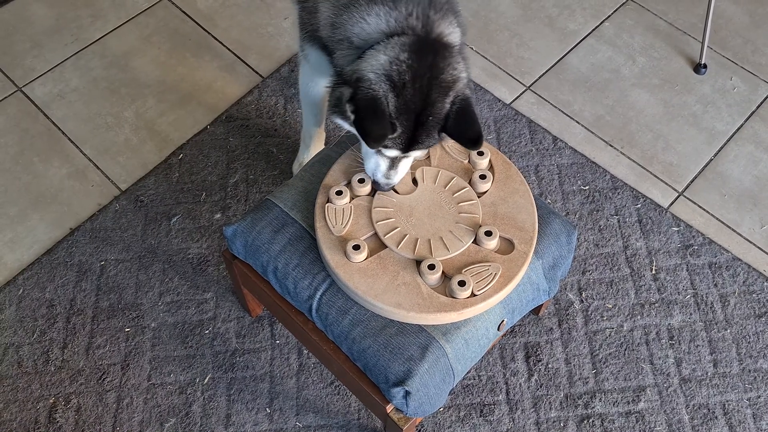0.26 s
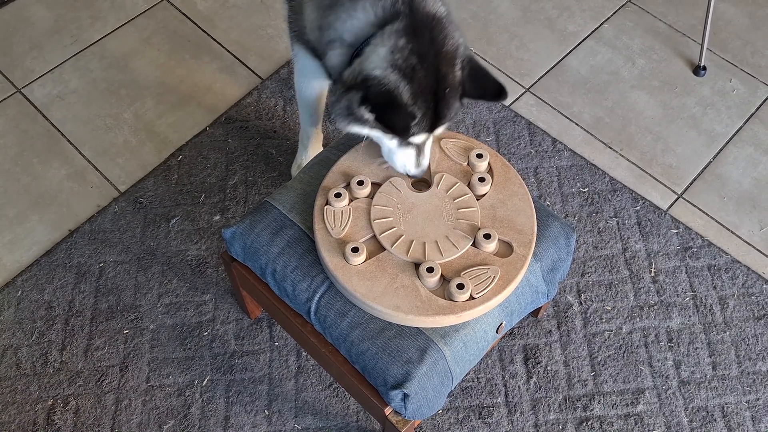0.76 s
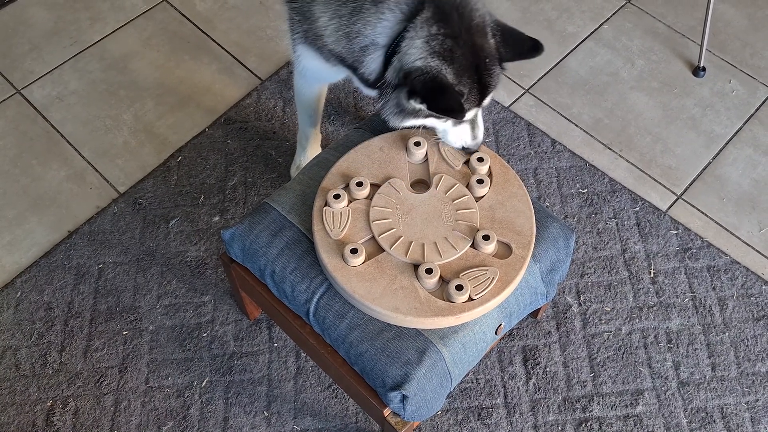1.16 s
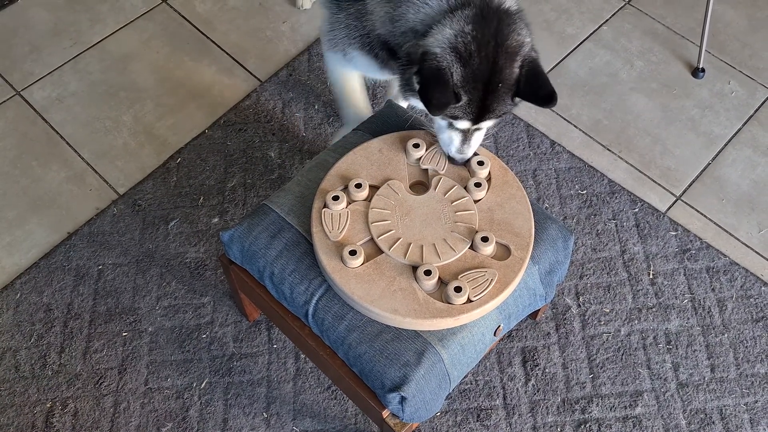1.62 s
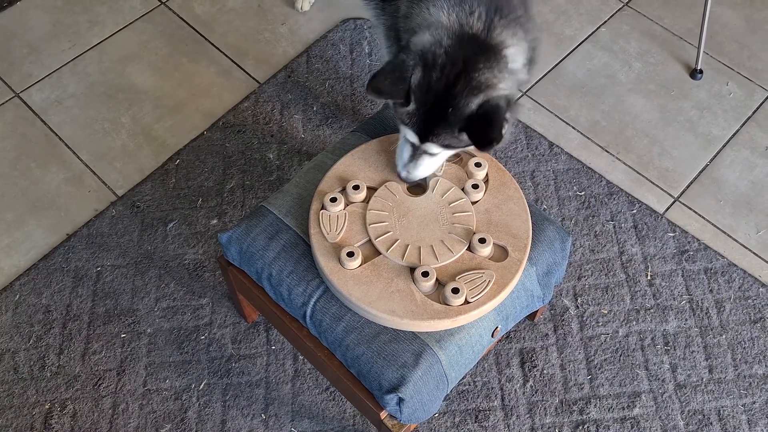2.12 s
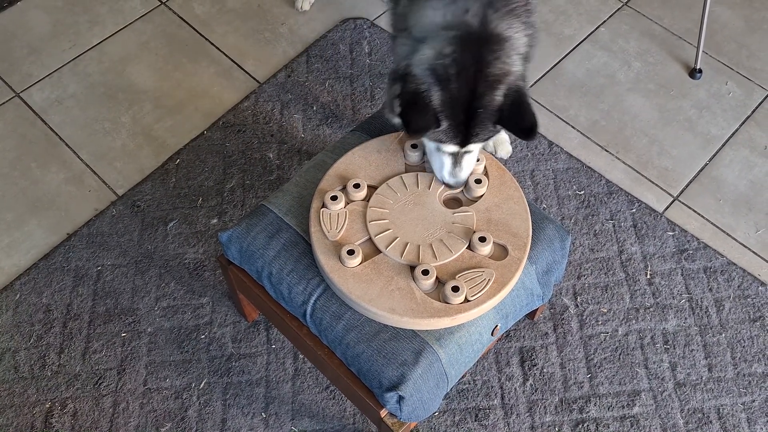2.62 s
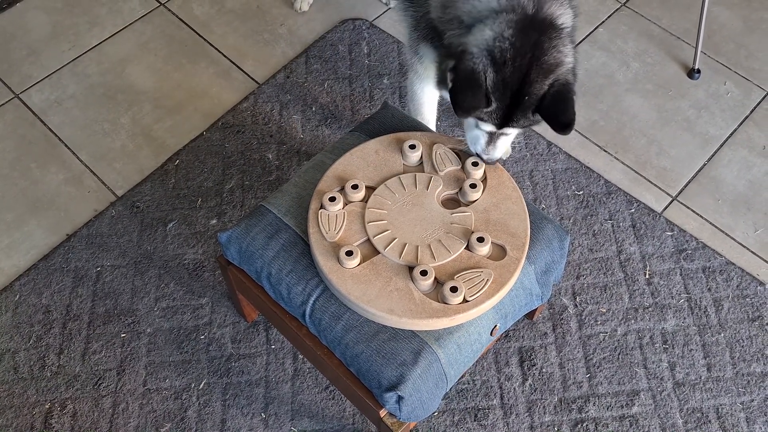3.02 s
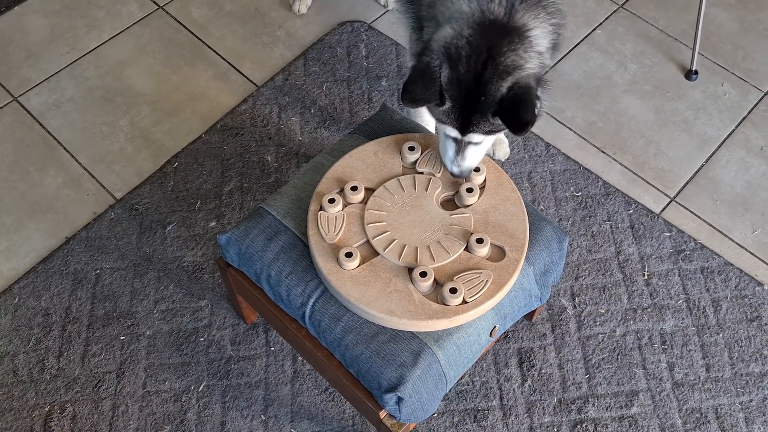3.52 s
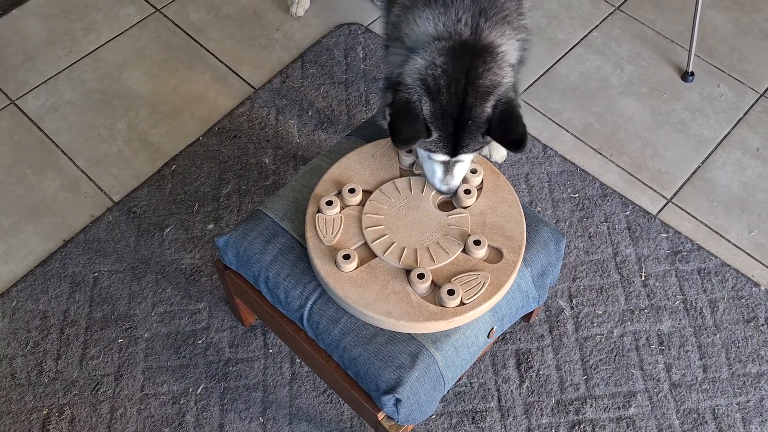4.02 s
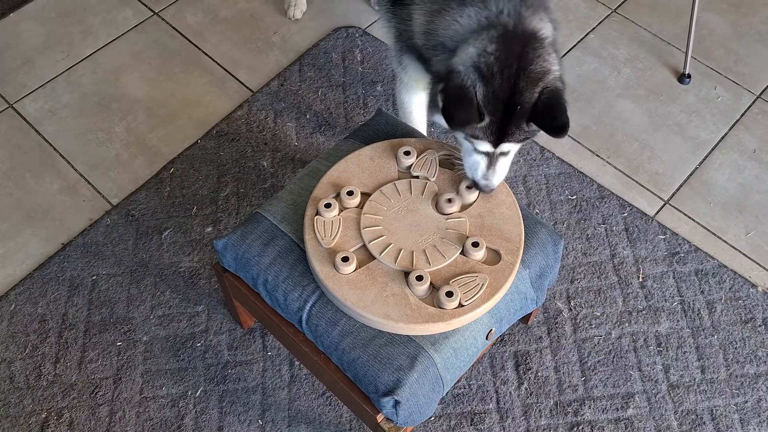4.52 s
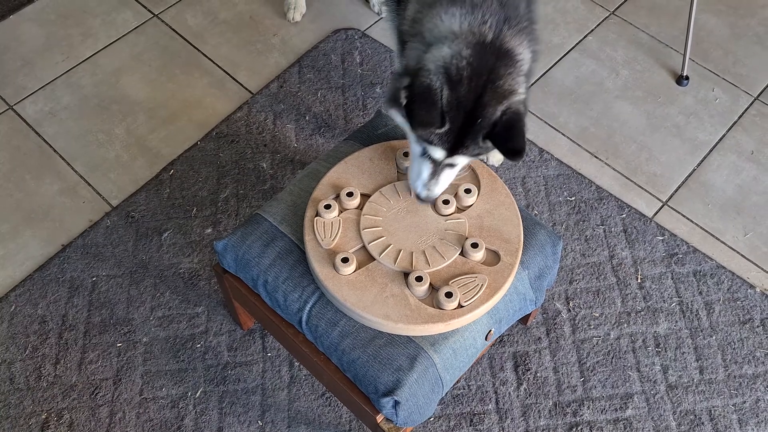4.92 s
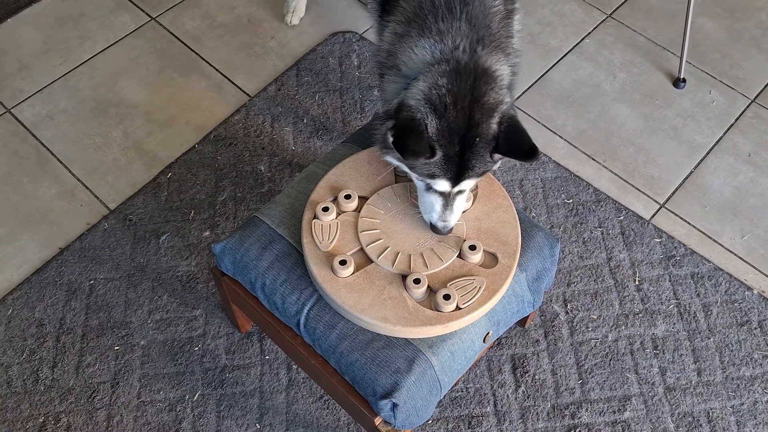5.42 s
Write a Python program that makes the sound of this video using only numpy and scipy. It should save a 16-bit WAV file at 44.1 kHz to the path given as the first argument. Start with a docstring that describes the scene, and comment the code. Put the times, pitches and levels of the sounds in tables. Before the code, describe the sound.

Indoors in a hard, tiled room, a dog noses loose wooden pieces on a puzzle board. A short breathy sniff and a hard hollow clack come at once, at 0.0 seconds, then near quiet with a faint sniff around 0.5 and a very soft scrape around 0.9. From 1.1 to 1.4 a run of taps and a firm knock rattles out; a light click and rub follow at 1.5 to 1.6, then weak nudges. Small sniffs come at about 2.15 and 2.4, with a solid knock at 2.5. Moderate double clacks land near 3.0 and 3.3, softer touches until 4.3. At 4.5 to 4.6 comes a dense loud scrape and rattle ending in a sharp clack. A dragging rub at 5.1 to 5.25 leads to light claps and faint nudges. The wood sounds dry, mid-pitched and close, slightly right, with a half-second room tail over a very quiet low hum.

```python
"""Wooden pegs and lids knock and scrape on a puzzle board that a husky noses at, on a padded footstool.
Each knock rings a bank of wood modes; each slide feeds them a stream of tiny stick-slip blows.
The dog's sniffs are noise through a nose filter, over the low murmur and hums of a still house.
A tiled room answers with early reflections and a dense tail.
A camera with two microphone ports hears it from about a metre above."""
import sys
import numpy as np
from scipy import signal
from scipy.fft import rfft, irfft
from scipy.io import wavfile

SR = 44100
rng = np.random.default_rng(int(sys.argv[2]) if len(sys.argv) > 2 else 0)


def transcribe(signal):
    """Save signal, clipped to [-1, 1], as a 16-bit WAV file at the path in sys.argv[1]."""
    frames = np.atleast_2d(signal).T
    limited = np.clip(frames, -1, 1)
    pcm = np.round(limited * 32767).astype(np.int16)
    wavfile.write(sys.argv[1], SR, pcm)


N = 249606  # length in samples
TAPS = 4096  # length of the wood and nose filters in samples
HZ = np.fft.rfftfreq(TAPS, 1 / SR)


def gain_of(db):
    """Decibels to amplitude."""
    return 10 ** (np.asarray(db) / 20)


def evened(x):
    """Scales to an rms of one."""
    return x / np.sqrt(np.mean(x ** 2) + 1e-20)


def read(points, hz):
    """Joins (f/Hz, value) points by straight lines on a log-frequency axis."""
    f, value = np.transpose(points)
    return np.interp(np.log(hz + 1), np.log(f + 1), value)


def add(mix, s, sound):
    """Adds a sound to the mix at time s."""
    part = mix[..., round(s * SR):][..., :sound.shape[-1]]
    part += sound[..., :part.shape[-1]]


def causal(db):
    """Minimum-phase impulse response: it has this spectrum, starts at once and rings out."""
    cepstrum = irfft(np.log(gain_of(np.maximum(db, -100))))
    # fold the cepstrum onto positive time
    cepstrum[1:TAPS // 2] *= 2
    cepstrum[TAPS // 2 + 1:] = 0
    return irfft(np.exp(rfft(cepstrum)))


def resonance(centre_hz, width_hz, hz=HZ):
    """Power response of a resonance with steep skirts."""
    return 1 / (1 + (2 * (hz - centre_hz) / width_hz) ** 2) ** 2


def swell(start, top, end, curve):
    """An envelope that rises towards one and falls again; a curve below 1 makes it fuller."""
    t = np.arange(start, end, 1 / SR)
    return np.interp(t, [start, top, end], [0, 1, 0]) ** curve


def diffuse(pair, alike_hz=1300, likeness=0.88):
    """Sound from all sides: the two ports agree in the bass and drift apart in the treble."""
    a, b = rfft(pair)
    hz = np.fft.rfftfreq(pair.shape[1], 1 / SR)
    same = likeness / (1 + (hz / alike_hz) ** 2)
    left = same * a + np.sqrt(1 - same ** 2) * b
    return irfft(np.array([left, a]), pair.shape[1])


# spectrum of the still room: (f/Hz, relative level/dB per Hz)
MURMUR = [(20, -16.5), (37, -4.5), (60, -10), (100, -5.5), (140, -7.5), (215, -12.5), (300, -11.5),
          (500, -17), (730, -16), (900, -18.5), (1150, -16), (2000, -20), (2600, -25), (4500, -31),
          (7300, -30.5), (8800, -54.5), (15500, -58)]
# narrow hums standing out of it: (f/Hz, width/Hz, level/dB per Hz on the same scale)
NARROW_HUMS = [(82.5, 10, 2), (279.4, 30, -2), (420, 25, -10), (715, 50, -11.5)]
HUSH_DB = -60  # rms over both ports, before scene() leans it to the right


def hush():
    """The low steady murmur of a house: noise shaped by a broad spectrum and a few narrow hums."""
    hz = np.fft.rfftfreq(N, 1 / SR)
    power = gain_of(read(MURMUR, hz)) ** 2
    for f, width_hz, db in NARROW_HUMS:
        power = power + gain_of(db) ** 2 * resonance(f, width_hz, hz)
    noise = irfft(rfft(rng.standard_normal((2, N))) * np.sqrt(power), N)
    return gain_of(HUSH_DB) * evened(diffuse(noise))


# the dog's nose: (start t/s, strongest t/s, end t/s, level/dB, nostril whistle f/Hz,
# whistle level/dB against the rush)
NOSE_DRAUGHTS = [(0.008, 0.04, 0.091, -41.5, 1940, 4), (0.436, 0.547, 0.55, -48.5, 1310, 2),
                 (2.111, 2.156, 2.183, -50, 1880, 8.5), (2.353, 2.423, 2.562, -46, 3820, -5),
                 (4.01, 4.072, 4.33, -63, 2010, 4.5)]
# air rushing through the nose: (f/Hz, relative level/dB per Hz)
NOSE_RUSH = [(150, -28), (450, -2.5), (900, -9), (1200, -8), (2500, -9), (4000, -6.5), (5500, -18.5),
             (7400, -9.5), (9000, -26.5), (15000, -32.5)]


def sniffs(whistle_width_hz=500):
    """Short draughts through the dog's nose: a wide rush and one narrow nostril resonance."""
    out, air = np.zeros(N), rng.standard_normal(N)
    rush = evened(gain_of(read(NOSE_RUSH, HZ)))
    for start, top, end, db, whistle_hz, whistle_db in NOSE_DRAUGHTS:
        flow = swell(start, top, end, 0.65)
        whistle = gain_of(whistle_db) * evened(np.sqrt(resonance(whistle_hz, whistle_width_hz)))
        nose = causal(10 * np.log10(rush ** 2 + whistle ** 2))
        draught = flow * air[round(start * SR):][:len(flow)]
        add(out, start, gain_of(db) * signal.fftconvolve(draught, nose / np.linalg.norm(nose)))
    return out


# the puzzle's modes by family (thump, board, lid, peg, edge), before the blow's pitch factor and
# family levels: (f/Hz, width/Hz, level/dB)
WOOD_MODES = {"thump": [(338, 110, -17), (421.8, 36, -9), (439, 86, -22.5), (548, 45, -13),
              (696, 170, -11.5)], "board": [(1112, 107, -5), (1217, 233, -2.5), (1300.5, 49, -1),
              (1420, 110, -1), (1547, 98, -6.5)], "lid": [(1675, 100, -3), (1802, 120, -1), (2000, 150, -5),
              (2188, 200, -7), (2530, 130, -13.5), (2746, 160, -9), (2950, 210, -20.5)],
              "peg": [(3075, 480, -12), (3475, 410, -15.5), (4880, 240, -26.5)],
              "edge": [(4180, 1900, -23.5), (5740, 1300, -22.5), (6920, 1400, -23.5), (10500, 7200, -48)]}
# a blow crosses the board and returns from its rim: (round trip t/s, share that leaves at once)
RIM_RETURNS = [(.00031, 0.57), (.00068, 0.6)]


def wood(thump_db, clack_db, click_db, edge_db, pitch=1):
    """The puzzle's ring; each piece has its own pitch, and the touch favours some families of modes."""
    family_db = dict(thump=thump_db, board=0, lid=clack_db, peg=click_db, edge=edge_db)
    power = 0
    for family, modes in WOOD_MODES.items():
        for f, width_hz, db in modes:
            power = power + gain_of(db + family_db[family]) ** 2 * resonance(f * pitch, width_hz)
    ring = rfft(causal(10 * np.log10(power)))
    # all-pass loops spread the blow over a few milliseconds and keep its colour
    for trip_s, share in RIM_RETURNS:
        trip = np.exp(-2j * np.pi * HZ * trip_s)
        ring = ring * (trip - share) / (1 - share * trip)
    return irfft(ring)


# harder contact is shorter and favours the high modes: level/dB gained per dB of hardness
# by (lid clack, peg click, hard edge)
HARDNESS_TILT = (.45, 0.89, 1)


def brightened(colour, hardness_db):
    """Levels of the lid, peg and edge modes for a contact of this hardness."""
    return np.array(colour) + hardness_db * np.array(HARDNESS_TILT)


# one row a knock: (t/s, blow, level/dB before the common trim, board thump level/dB,
# hardness/dB, left-right level/dB in the treble, minus to the right)
BOARD_KNOCKS = [ (0.0203, "lid", 3.5, 3.5, 0, -11), (.0363, "stop", 26.5, -2.5, -0.5, -9),
                (0.0596, "lid", 9, 5, -8, -5), (1.1329, "tap", 5.5, -1, 3, -3.5),
                (1.161, "tap", 12, -1, 3, -5), (1.2469, "tap", 15, -8, 0, -2.5),
                (1.2695, "stop", 21.5, 5, -1.5, -0.5), (1.3996, "tap", 1, 2, -2, 6),
                (1.4055, "tap", 11, 0.5, -2.5, -4), (1.611, "peg", 5.5, 2.5, 0, -10),
                (1.7356, "nudge", -9.5, 10.5, -5, -8), (1.828, "lid", 1.5, 2.5, 3, -4),
                (1.9773, "nudge", -10.5, 10, 1.5, -6), (2.295, "nudge", -16.5, 15, 11, -11),
                (2.47, "stop", 18, -8, 0.5, -9.5), (2.497, "tap", 11.5, -1.5, -2.5, -1),
                (2.6552, "peg", -24, 2, -0.5, -8), (2.838, "nudge", -4.5, 6.5, 4, -5.5),
                (2.8828, "tap", 0.5, 1, -10.5, -2), (2.9714, "stop", 13.5, -3.5, -0.5, -8.5),
                (2.975, "tap", 14, 7, -1, -1), (3.136, "nudge", -17, 17.5, -9, -4),
                (3.2928, "stop", 10, 1, -1.5, 2), (3.299, "tap", 8.5, 10, 1, -6),
                (3.323, "peg", 1, 15, 0, -7.5), (3.561, "nudge", -16, 7, -3, -5),
                (3.786, "lid", -1, 3, 0.5, -7), (4.1006, "nudge", -17.5, 16.5, 0, -9),
                (4.16, "lid", -9, 5, -1.5, 1), (4.1656, "lid", 4, 1, 3, -6),
                (4.3016, "nudge", -4, 7.5, 0, 0), (4.4967, "stop", 13, -0.5, 2, -4.5),
                (4.552, "lid", 18, 11, 5.5, -8.5), (4.5571, "stop", 16, 8.5, 2, -4),
                (4.5957, "stop", 13.5, 11.5, -5.5, -3), (4.602, "tap", 28.5, -9, 6, -4),
                (5.1889, "lid", 1.5, 11, -9, -1), (5.1959, "lid", 6, -5, -2.5, -11),
                (5.2897, "nudge", -10, 14.5, 0, -3), (5.405, "nudge", -5.5, 10, -3, -4),
                (5.488, "peg", -23, 1, -0.5, -5.5)]
# the ways the wood is struck, before hardness: (lid clack level/dB, peg click level/dB,
# hard edge level/dB, factor on the modes' f, level/dB sent to the room, skid level/dB against the knock row)
# stop: a lid runs into the end of its slot; tap: a piece tips against the board;
# lid: a loose lid claps flat; peg: a peg clicks in its socket; nudge: the muzzle shoves a piece along
BLOW_COLOURS = {"stop": (-2.5, -3, -2.5, 1.0031, -2.5, -61), "tap": (-2.5, 0.5, -4, 1.06, -3, -63),
                "lid": (4.5, 0, -14.5, 0.97, -7.5, -58.5), "peg": (8.5, 22, 5, 1.05, -3.5, -52.5),
                "nudge": (-4, -3.5, -8.5, 1.17, -4.5, -42.5)}


def knocks(trim_db=-1, shadow_hz=900):
    """Each knock rings the wood once; returns the sound at the ports and the sound sent into the room."""
    near, sent = np.zeros((2, N)), np.zeros(N)
    shadow = HZ ** 2 / (HZ ** 2 + shadow_hz ** 2)  # the camera body shades treble only
    for s, blow, db, thump_db, hardness_db, pan_db in BOARD_KNOCKS:
        *colour, pitch, room_db, _ = BLOW_COLOURS[blow]
        ring = gain_of(db + trim_db) * wood(thump_db, *brightened(colour, hardness_db), pitch)
        left = signal.fftconvolve(ring, causal(pan_db / 2 * shadow))
        right = signal.fftconvolve(ring, causal(-pan_db / 2 * shadow))
        add(near, s, np.array([left, right]))
        add(sent, s, gain_of(room_db) * ring)
    return near, sent


def skids(rise_s=.006, length_s=.04, hardness_change_db=-4):
    """The short slide that follows each knock, softer in touch than the knock itself."""
    rows = []
    for s, blow, db, thump_db, hardness_db, _ in BOARD_KNOCKS:
        skid_db = db + BLOW_COLOURS[blow][-1]
        rows.append((s, s + rise_s, s + length_s, skid_db, thump_db, hardness_db + hardness_change_db))
    return rows


# lids and pegs dragged in their slots, the first row the dog's muzzle rubbing the board: (start t/s, hardest
# t/s, end t/s, level/dB, # board thump level/dB, hardness/dB)
BOARD_SLIDES = [(0.805, 0.955, 1.074, -54, 8.5, 7.5), (1.47, 1.559, 1.61, -45.5, -2, 3.5),
                (2.31, 2.48, 2.47, -43, -2, -4), (3.27, 3.3, 3.33, -38.5, -2, 4),
                (3.923, 3.939, 4.01, -56, 14.5, -15), (4.497, 4.503, 4.615, -33.5, 6.5, 2.5),
                (4.545, 4.555, 4.604, -29.5, 11.5, 4.5), (5.091, 5.127, 5.16, -32.5, 6.5, -4.5),
                (5.125, 5.17, 5.26, -36.5, 4.5, -1.5)]
# colour of wood rubbing on wood, before hardness: (lid clack level/dB, peg click level/dB,
# hard edge level/dB)
RUB_COLOUR = (-1.7, 1, -5)


def slides(slips_per_s=550, spread_db=3.5, curve=1.0):
    """Wood sticks and slips on wood: a stream of tiny uneven blows into the same modes."""
    out = np.zeros(N)
    slips = (rng.random(N) < slips_per_s / SR) * rng.choice([-1, 1], N)
    slips = slips * gain_of(spread_db * np.clip(rng.standard_normal(N), -2, 2))
    for start, top, end, db, thump_db, hardness_db in BOARD_SLIDES + skids():
        push = swell(start, top, end, curve)
        drive = evened(slips[round(start * SR):][:len(push)]) * push
        ring = wood(thump_db, *brightened(RUB_COLOUR, hardness_db))
        add(out, start, gain_of(db) * signal.fftconvolve(drive, ring / np.linalg.norm(ring)))
    return out


# first reflections off ceiling, floor and furniture: (t/s after the straight path, level/dB)
FIRST_ECHOES = [(.0021, -19), (.0074, -12.5), (.0084, -15), (.0098, -19.5), (0.014, -17.5), (0.0177, -19.5),
                (.0245, -26.5)]
PORT_LAG_S = .00007  # the right port hears the board this much later


def paths(near, dull_hz=6000):
    """The straight path and a few slightly dulled reflections, all reaching the right port a little late."""
    hz = np.fft.rfftfreq(N, 1 / SR)
    echoes = sum(gain_of(db) * np.exp(-2j * np.pi * hz * s) for s, db in FIRST_ECHOES)
    echoes = echoes / (1 + 1j * hz / dull_hz)
    ports = np.exp(-2j * np.pi * hz * np.array([[0], [PORT_LAG_S]]))
    return irfft(rfft(near) * (1 + echoes) * ports, N)


# the room's tail: (f/Hz, 60 dB decay t/s, relative level/dB)
ROOM_TAIL = [(200, 0.32, 1.5), (500, 0.52, -1), (1340, 0.45, 1.5), (2330, 0.45, 2.5), (3560, 0.41, -2),
             (7000, 0.42, -0.5), (12200, 0.22, -3.5)]


def room(sent, build_s=0.0026, early_db=5, early_s=0.018, tail_db=-3):
    """Dense reflections: nearby furniture scatters first, then each band dies at its own speed."""
    t = np.arange(SR) / SR
    # random signed clicks, about 5000 a second
    clicks = diffuse(rng.choice([-1., 1.], (2, SR)) * (rng.random((2, SR)) < 5000 / SR))
    hz, frame_s, bands = signal.stft(clicks, SR, nperseg=256)
    points = np.array(ROOM_TAIL)
    t60 = read(points[:, [0, 1]], hz)[:, None]
    db = read(points[:, [0, 2]], hz)[:, None]
    tail = signal.istft(bands * gain_of(db - 60 * frame_s / t60), SR, nperseg=256)[1][:, :SR]
    tail *= 1 - np.exp(-(t / build_s) ** 2)  # gradual build-up
    tail *= gain_of(early_db * np.exp(-t / early_s))  # stronger early scatter
    tail = tail / np.linalg.norm(tail, axis=1, keepdims=True)
    return gain_of(tail_db) * signal.fftconvolve(sent[None], tail, axes=1)[:, :N]


def scene(rub_room_db=-3, pan_db=-2, room_pan_db=-1.9):
    """Knocks, slides and sniffs come from the board, slightly to the right, and fill the room."""
    near, sent = knocks()
    soft = slides() + sniffs()
    soft_pan = gain_of([[pan_db / 2], [-pan_db / 2]])
    room_pan = gain_of([[room_pan_db / 2], [-room_pan_db / 2]])
    direct = paths(near + soft * soft_pan)
    around = room(sent + gain_of(rub_room_db) * soft) + hush()
    return direct + room_pan * around


def record(dry, edge_hz=15900):
    """Clips at full scale, then a linear-phase low-pass sets the band limit."""
    lowpass = signal.firwin(511, edge_hz, window=("kaiser", 9), fs=SR)
    return signal.oaconvolve(np.clip(dry, -1, 1), lowpass[None], "same")


dry = scene()
out = record(dry)
transcribe(out)
```